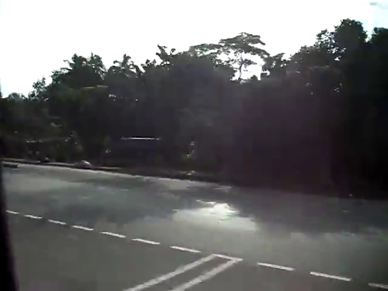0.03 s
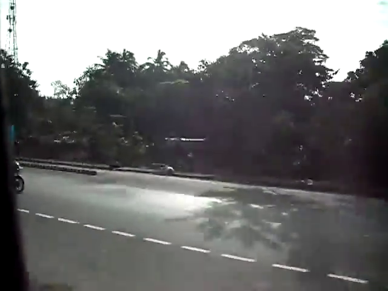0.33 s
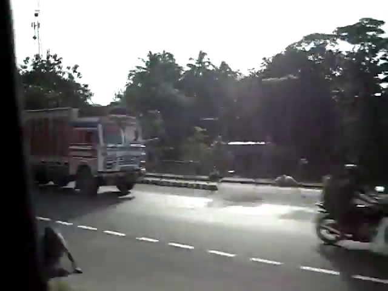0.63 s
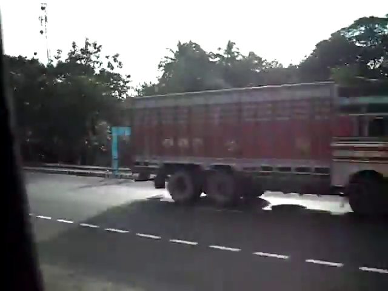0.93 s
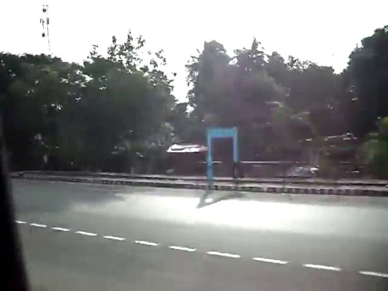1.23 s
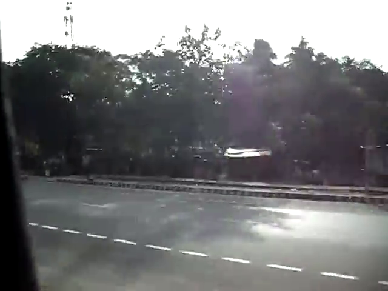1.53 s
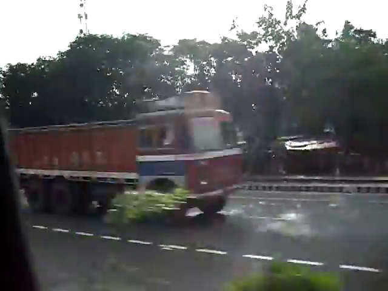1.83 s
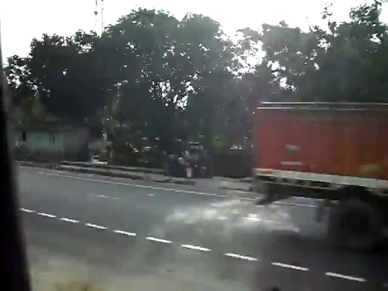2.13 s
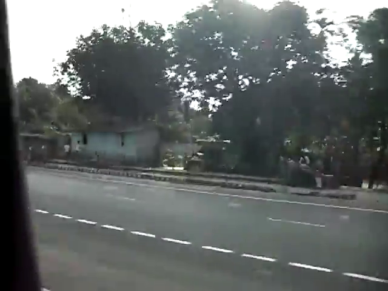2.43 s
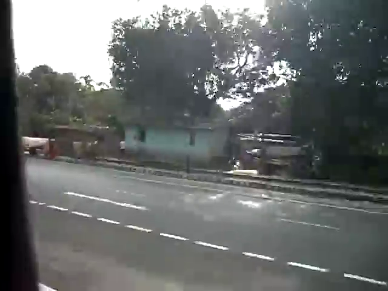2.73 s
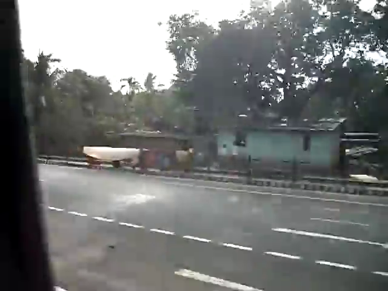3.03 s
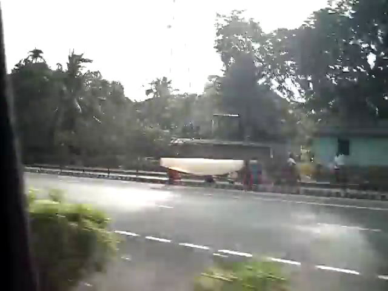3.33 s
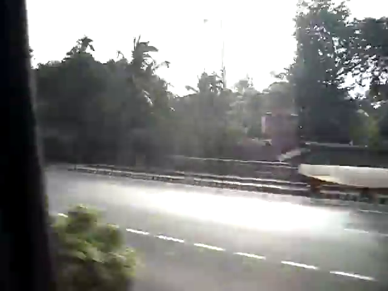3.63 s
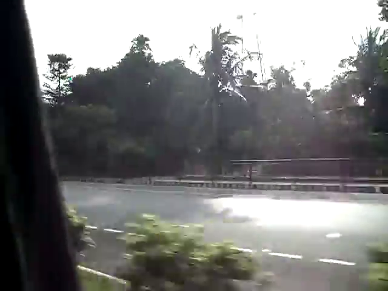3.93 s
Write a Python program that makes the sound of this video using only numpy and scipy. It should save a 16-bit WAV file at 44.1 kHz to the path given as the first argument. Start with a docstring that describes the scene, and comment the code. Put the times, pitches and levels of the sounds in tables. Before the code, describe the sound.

Heavy, uneven wind gusts hit a small microphone at an open bus window, thumping and tearing in quick succession with only brief dips. Beneath the close buffeting, the engine and the road give a quieter, steady rumble.

```python
"""At the open window of a moving bus, wind batters a small microphone.
Turbulent pressure drives the diaphragm: large eddies thump and small ones churn. In each gust the flow
separates from the housing in ragged, rasping bursts, and the strongest peaks overload the capsule.
The engine's firing harmonics and the broadband noise of the tyres rumble underneath."""
import sys
import numpy as np
from scipy import signal
from scipy.fft import rfft, irfft
from scipy.io import wavfile
from scipy.ndimage import uniform_filter1d

SR = 44100
rng = np.random.default_rng(int(sys.argv[2]) if len(sys.argv) > 2 else 0)


def unload_wav(signal):
    """Save mono or channel-first audio to the path in sys.argv[1] as 16-bit WAV at rate SR, clipped to [-1, 1]."""
    wavfile.write(
        sys.argv[1],
        SR,
        np.round(np.clip(np.atleast_2d(signal).T, -1, 1) * 32767).astype(np.int16),
    )


N = 176400


def undb(db):
    """Amplitude ratio of a level in decibels."""
    return 10 ** (np.asarray(db) / 20)


def unit(x):
    """Normalisation to an rms of 1."""
    return x / np.sqrt(np.mean(x ** 2))


def noise(spectrum):
    """Spectral shaping: noise of rms 1 whose density follows rows of frequency_hz, relative_db."""
    hz, db = np.array(spectrum, float).T
    f = np.maximum(np.fft.rfftfreq(N, 1 / SR), 1)
    gain = undb(np.interp(np.log(f), np.log(hz), db))
    return unit(irfft(rfft(rng.standard_normal(N)) * gain, N))


def wander(hz):
    """Low-pass noise: a smooth random fluctuation of rms 1, with rates up to about hz."""
    f = np.fft.rfftfreq(N, 1 / SR)
    return unit(irfft(rfft(rng.standard_normal(N)) / (1 + (f / hz) ** 2), N))


def steady(x, samples):
    """Division by the running rms evens out slow swells and keeps the fast detail."""
    return x / np.sqrt(uniform_filter1d(uniform_filter1d(x ** 2, samples), samples) + 1e-12)


def gusts(t):
    """Envelope of the flow: trapezoidal gusts and a weak breeze add in power, as incoherent sources do."""
    # Gusts that tear at the housing: start_s, length_s, level_db
    gust_events = [(0.0, 0.046, -31), (0.077, 0.0055, -30), (0.12, 0.0083, -39.5), (0.279, 0.054, -27),
                   (0.339, 0.028, -38), (0.368, 0.02, -27.5), (0.38, 0.015, -21), (0.397, 0.059, -26),
                   (0.453, 0.072, -30), (0.55, 0.023, -26), (0.576, 0.087, -34.5), (0.592, 0.0061, -25.5),
                   (0.651, 0.045, -24), (0.711, 0.061, -28), (0.784, 0.03, -26), (0.812, 0.035, -19),
                   (0.852, 0.077, -27.5), (0.964, 0.023, -32), (1.058, 0.051, -28.5), (1.117, 0.065, -23.5),
                   (1.197, 0.031, -26.5), (1.225, 0.081, -31.5), (1.338, 0.032, -32), (1.369, 0.0064, -16),
                   (1.373, 0.064, -24.5), (1.452, 0.081, -24), (1.541, 0.035, -22), (1.585, 0.052, -29),
                   (1.633, 0.036, -22), (1.652, 0.085, -27), (1.705, 0.024, -17), (1.727, 0.012, -32),
                   (1.742, 0.0293, -20.5), (1.778, 0.043, -17.5), (1.836, 0.035, -32.5),
                   (1.88, 0.012, -24.5), (1.915, 0.032, -28), (1.938, 0.038, -19), (1.979, 0.033, -26.5),
                   (2.001, 0.039, -31.5), (2.064, 0.053, -26), (2.145, 0.02, -30), (2.174, 0.055, -24),
                   (2.24, 0.032, -27), (2.278, 0.041, -30.5), (2.333, 0.035, -40.5), (2.413, 0.024, -26.5),
                   (2.441, 0.03, -34.5), (2.481, 0.094, -23), (2.566, 0.045, -31), (2.657, 0.073, -25),
                   (2.737, 0.028, -34.5), (2.824, 0.024, -29), (2.854, 0.07, -23), (2.938, 0.021, -30.5),
                   (3.06, 0.051, -30.5), (3.132, 0.019, -37.5), (3.164, 0.052, -27.5),
                   (3.241, 0.097, -28.5), (3.349, 0.096, -22), (3.444, 0.033, -29.5), (3.491, 0.013, -22),
                   (3.523, 0.023, -33), (3.555, 0.03, -25), (3.594, 0.027, -22), (3.633, 0.0047, -30),
                   (3.651, 0.06, -25.5), (3.721, 0.025, -24.5), (3.74, 0.033, -34), (3.785, 0.047, -30),
                   (3.841, 0.0075, -22.5), (3.876, 0.059, -23.5), (3.948, 0.0065, -31.5),
                   (3.988, 0.015, -29)]
    attack_s, release_s, breeze_db = 0.0046, 0.0022, -55.5
    power = undb(breeze_db) ** 2
    for start_s, length_s, level_db in gust_events:
        rise = np.clip((t - start_s) / attack_s + .5, 0, 1)
        fall = np.clip((start_s + length_s - t) / release_s + .5, 0, 1)
        power = power + rise * fall * undb(level_db) ** 2
    return np.sqrt(power)


def flow_separation(strength):
    """Intermittency: the flow detaches and clings again, giving an envelope of millisecond bursts."""
    dense_db, thinning_db, depth_db = -27, 11.5, 15
    # Above dense_db the flow is mostly detached; below it the bursts grow rare.
    bias = np.clip((20 * np.log10(strength) - dense_db) / thinning_db, -1, 1)
    detached = np.tanh(2.46 * (wander(hz=162) + bias)) / 2
    return steady(undb(depth_db * detached), samples=640)


def eddies(t, bursts):
    """Turbulent pressure on the diaphragm: large eddies thump, smaller ones churn at higher frequencies."""
    # Strength of the buffeting: time_s, large_eddy_db, small_eddy_db
    buffeting = [(0.0, -30, -23), (0.1, -24.5, -34), (0.12, -16.5, -21), (0.2, -38.5, -50.5),
                 (0.29, -16.5, -21.5), (0.37, -28, -22), (0.38, -9, -15.5), (0.44, -19.5, -24),
                 (0.49, -3.5, -15.5), (0.53, -17.5, -49), (0.54, -15.5, -19), (0.6, -7, -29),
                 (0.63, -18, -20), (0.68, -14.5, -13.5), (0.7, -20, -23.5), (0.82, -13.5, -15.5),
                 (0.87, -17, -26.5), (0.92, -13.5, -20), (0.95, -23.5, -29), (1.05, -22, -29.5),
                 (1.1, -14, -15.5), (1.29, -17, -23), (1.31, -26, -41), (1.34, -17.5, -30.5),
                 (1.38, -11.5, -16), (1.64, -14, -18), (1.66, -10, -14.5), (2.03, -12, -17.5),
                 (2.06, -19, -21.5), (2.12, -8, -23), (2.14, -18.5, -25.5), (2.22, -13.5, -10.5),
                 (2.24, -29, -25), (2.29, -14.5, -19.5), (2.39, -22.5, -32.5), (2.44, -16.5, -22),
                 (2.58, -12, -14.5), (2.6, -16.5, -15), (2.64, -25.5, -38.5), (2.66, -16, -12),
                 (2.67, -16, -24), (2.75, -14.5, -20), (2.78, -20.5, -35), (2.87, -19.5, -18.5),
                 (2.97, -10, -19.5), (3.01, -30, -42), (3.09, -16.5, -21.5), (3.35, -13.5, -23),
                 (3.41, -16.5, -13.5), (3.43, -6.5, -21), (3.46, -23, -30), (3.5, -11.5, -12.5),
                 (3.51, -18, -27), (3.6, -5, -15), (3.62, -12, -27), (3.65, -24, -13), (3.7, -9, -22),
                 (3.93, -15.5, -16.5), (3.95, -18, -23), (4.0, -18.5, -31)]
    # Pressure spectrum of the large eddies: frequency_hz, relative_db
    thump_spectrum = [(5, -28), (16, 3.5), (28, 0), (55, 2), (90, -2), (150, -5), (220, -10.5), (450, -37),
                      (900, -48), (3000, -70)]
    # Pressure spectrum of the small eddies: frequency_hz, relative_db
    churn_spectrum = [(60, 5.5), (150, -4.5), (270, 2.5), (550, -6.5), (1000, -15), (2000, -24),
                      (4000, -48), (10000, -103)]
    time_s, large_db, small_db = np.array(buffeting).T
    thump = steady(noise(thump_spectrum), samples=1100)
    churn = noise(churn_spectrum)
    lumps = undb(8 * wander(hz=60)) * bursts ** 0.38  # small eddies bunch, partly with the bursts
    churn = steady(churn * lumps, samples=1100)
    thump_gain = undb(np.interp(t, time_s, large_db) + 2)
    churn_gain = undb(np.interp(t, time_s, small_db) + 3.5)
    return thump * thump_gain + churn * churn_gain


def crackle(strength):
    """Envelope of stray spits: a Poisson train of exponential decays frays the edges of the gusts."""
    spits_per_s, decay_s, reach_s = 40, 0.0016, 0.077
    onsets = rng.random(N) < spits_per_s / SR
    sizes = undb(2.5 * np.clip(rng.standard_normal(N), -2, 2))
    spits = signal.lfilter([1], [1, -np.exp(-1 / (decay_s * SR))], onsets * sizes + 1e-18)
    nearby_flow = uniform_filter1d(strength, int(reach_s * SR))
    return spits * undb(-16) * nearby_flow ** 0.52  # spits stand out most in weak gusts


def tearing(flow):
    """Separated flow radiates broadband noise: a rasp, with gritty fizz in the strongest bursts."""
    # Mid-range noise of the torn flow: frequency_hz, relative_db
    rasp_spectrum = [(100, -7), (500, 5.5), (1000, 3), (2000, 0), (3300, -3.5), (4000, -9), (6000, -16.5),
                     (10000, -38.5)]
    # Treble noise of the torn flow: frequency_hz, relative_db
    fizz_spectrum = [(500, -10), (2000, -49), (3300, -5.5), (4200, 6.5), (7000, 4), (10000, 2.5)]
    knee_db, max_growth_db = -23, 5.5  # the fizz outgrows the rasp, up to a limit
    growth = np.minimum((flow / undb(knee_db)) ** 1.1, undb(max_growth_db))
    rasp = noise(rasp_spectrum)
    fizz = unit(noise(fizz_spectrum) * undb(3.5 * wander(hz=1500)))  # fast modulation makes the grit
    return flow * (undb(3.5) * rasp + undb(-5.5) * growth * fizz)


def engine():
    """Periodic firing gives a low harmonic series that wavers slightly in pitch and level."""
    # Harmonics of the firing rate: multiple, relative_db
    orders = [(1, 4), (2, 9), (3, 4.5)]
    firing_hz = 55.2 * (1 + .015 * wander(hz=5.5))
    phase = 2 * np.pi * np.cumsum(firing_hz) / SR
    tones = sum(undb(db + 2 * wander(hz=4)) * np.sin(multiple * phase) for multiple, db in orders)
    return undb(-36) * unit(tones)


def tyres():
    """Rolling contact with the road gives a steady random roar, strongest in the bass."""
    # Road noise: frequency_hz, relative_db
    road_spectrum = [(20, -6), (60, 2.5), (130, 1.5), (270, -15), (600, -26), (1500, -25.5), (3200, -28.5),
                     (4500, -67), (7500, -39), (10000, -36)]
    return undb(-38.5) * noise(road_spectrum)


def scene():
    """Superposition of the eddies, the tearing gusts and the rumble of the bus, in one channel."""
    t = np.arange(N) / SR
    strength = gusts(t)
    bursts = flow_separation(strength)
    buffet = eddies(t, bursts)
    torn_flow = np.hypot(strength * bursts, crackle(strength))
    return (buffet + tearing(torn_flow) + engine() + tyres())[None]


def record(dry):
    """Asymmetric saturation: the capsule stops hard one way and softly the other, and loses its treble."""
    hard_stop, soft_stop, knee_exponent, full_scale = 0.84, 0.72, 2.2, 0.617
    soft_side = dry / (1 + np.abs(dry / soft_stop) ** knee_exponent) ** (1 / knee_exponent)
    saturated = np.where(dry > 0, np.minimum(dry, hard_stop), soft_side)
    treble_hz, band_limit_hz = 10040, 12000
    dulled = signal.sosfilt(signal.butter(16, treble_hz, fs=SR, output="sos"), saturated)
    clipped = np.clip(dulled, -full_scale, full_scale)  # the electronics shave the last peaks
    return signal.sosfilt(signal.ellip(8, .2, 40, band_limit_hz, fs=SR, output="sos"), clipped)


dry = scene()
out = record(dry)
unload_wav(out)
```